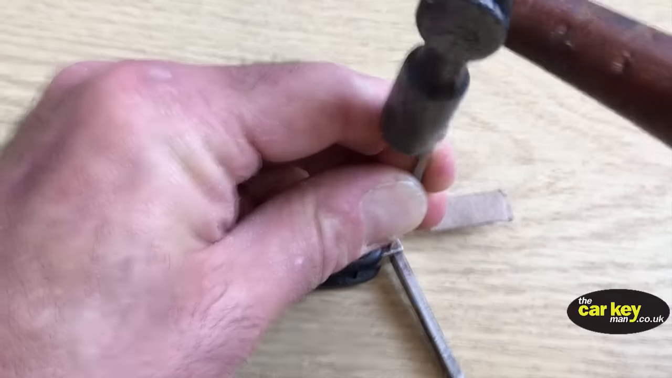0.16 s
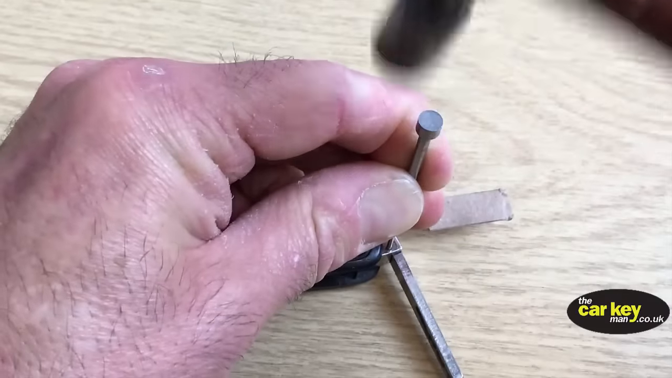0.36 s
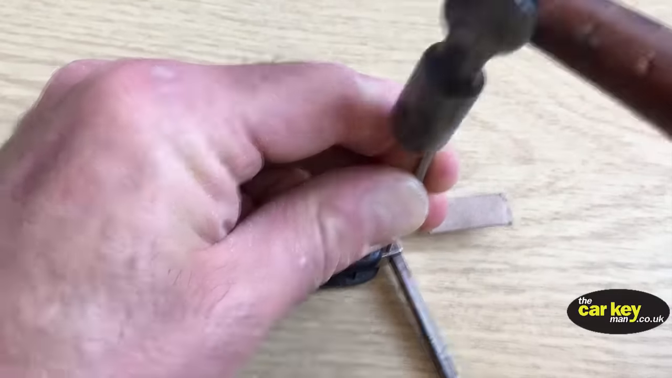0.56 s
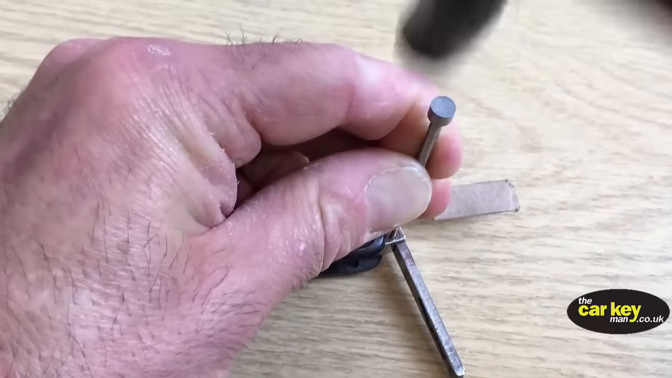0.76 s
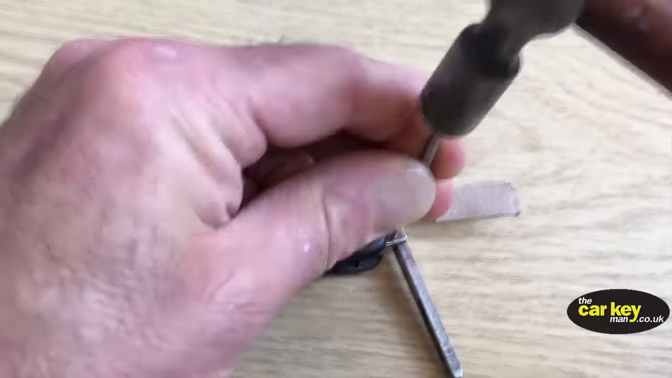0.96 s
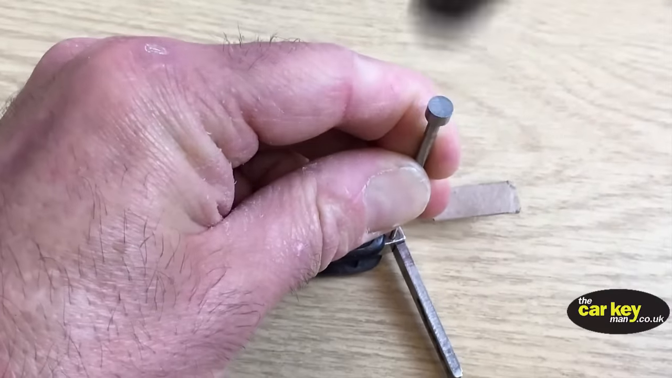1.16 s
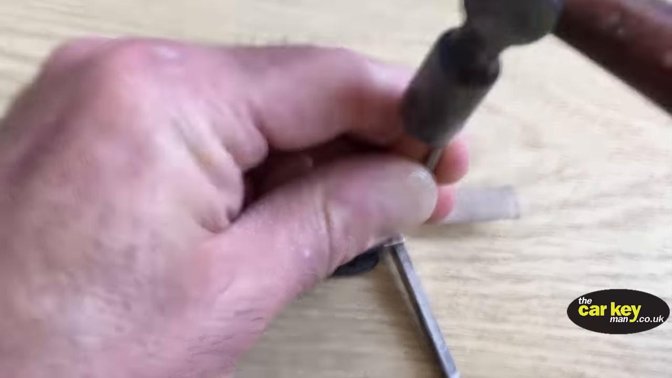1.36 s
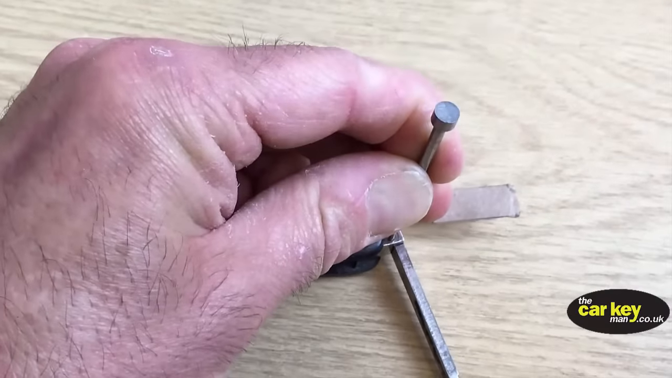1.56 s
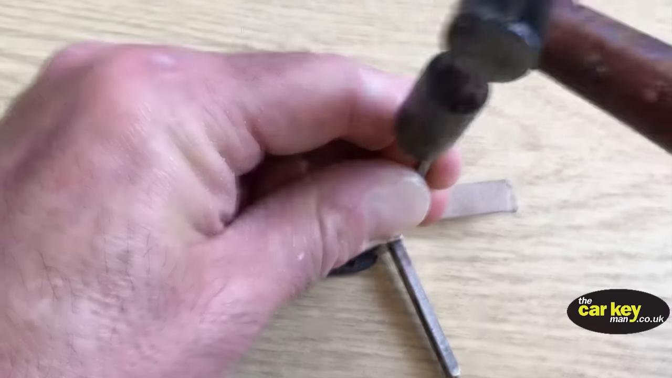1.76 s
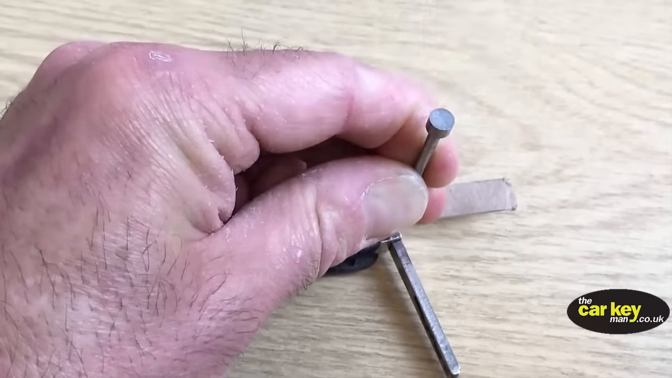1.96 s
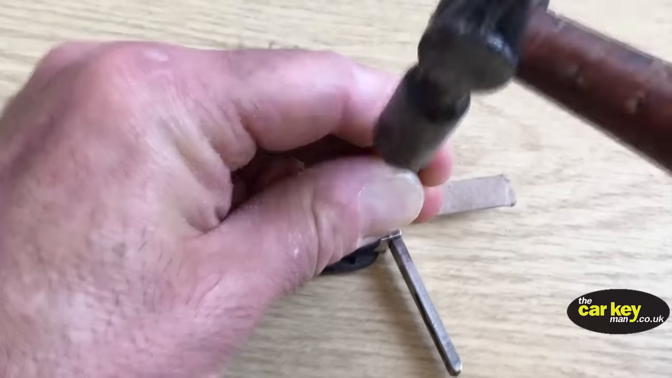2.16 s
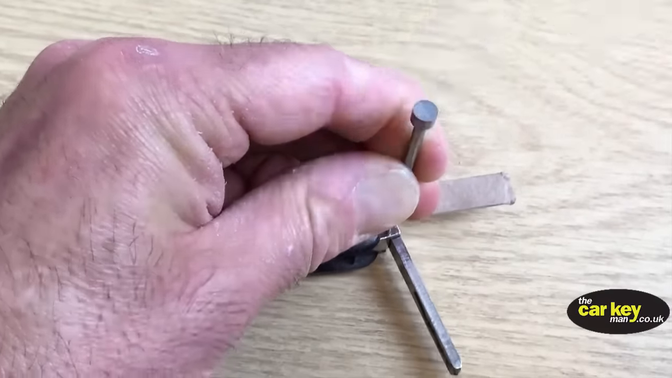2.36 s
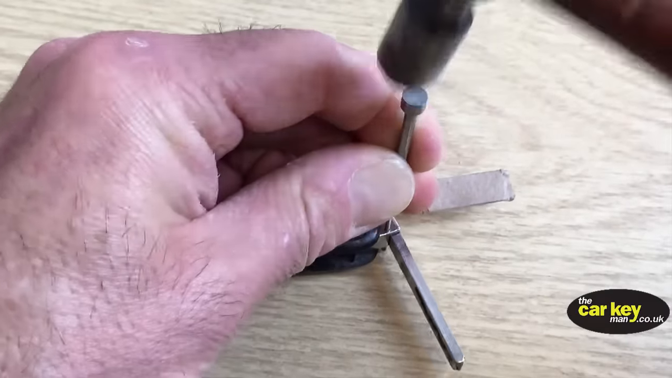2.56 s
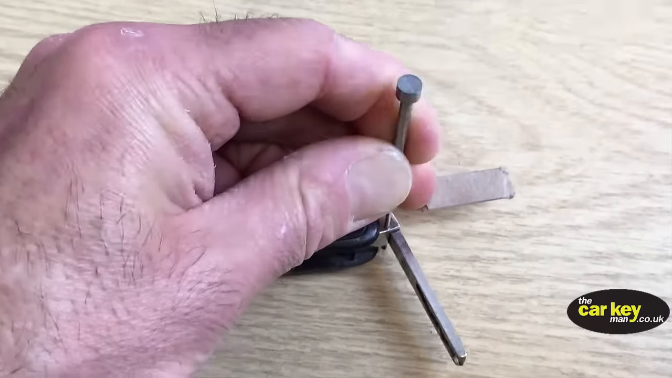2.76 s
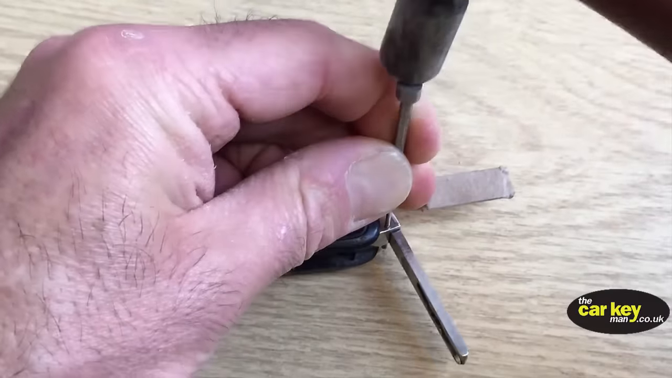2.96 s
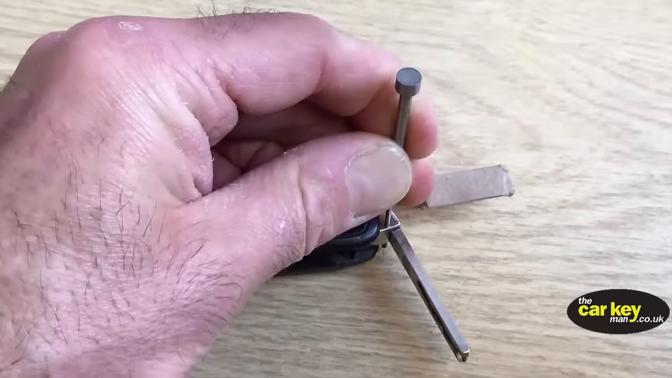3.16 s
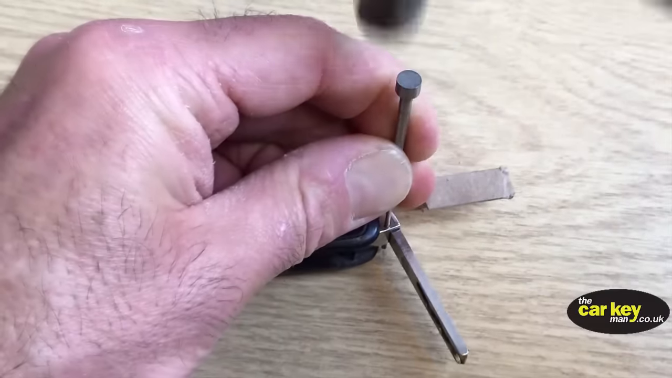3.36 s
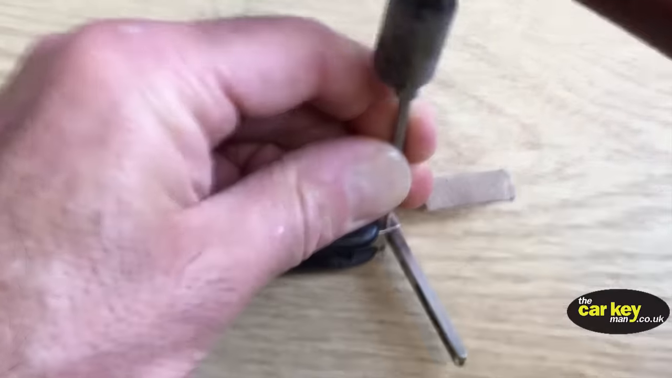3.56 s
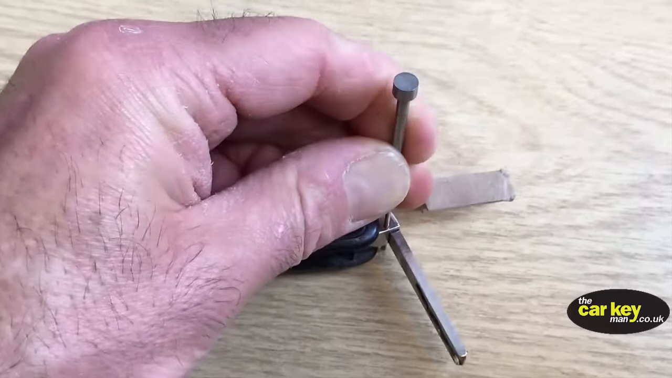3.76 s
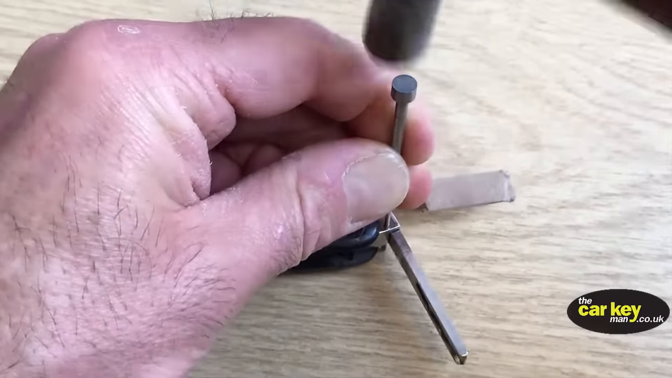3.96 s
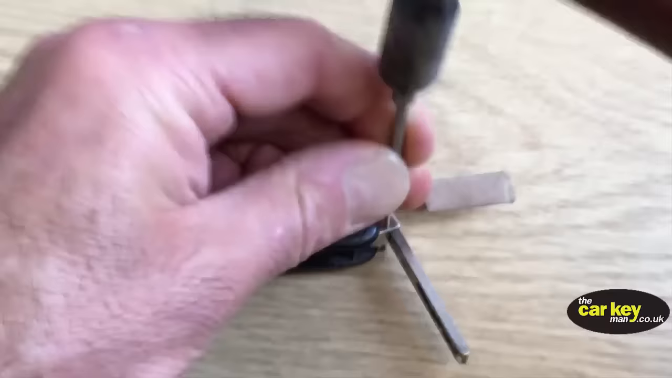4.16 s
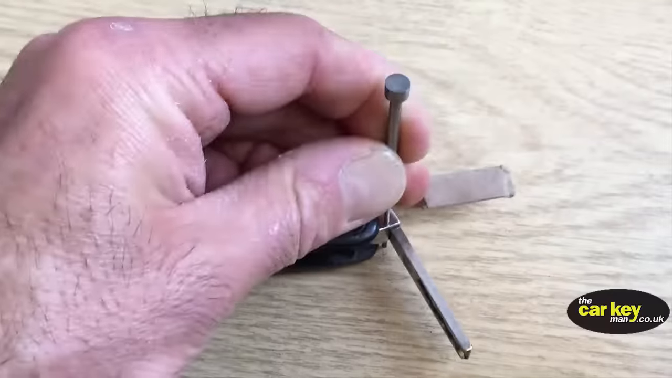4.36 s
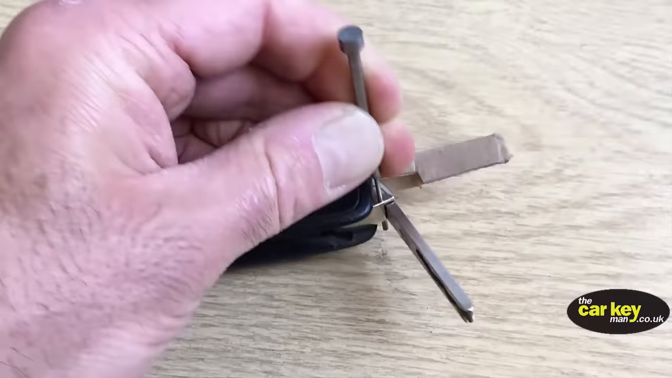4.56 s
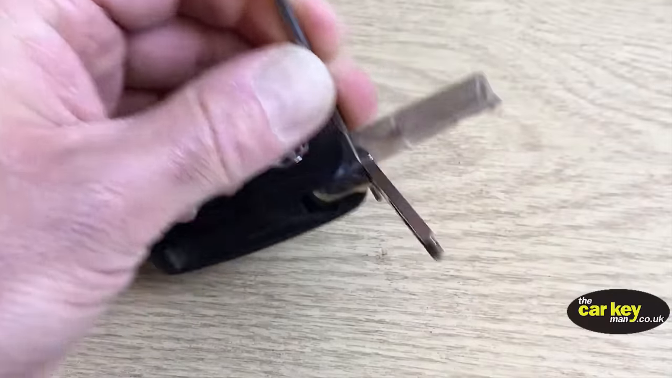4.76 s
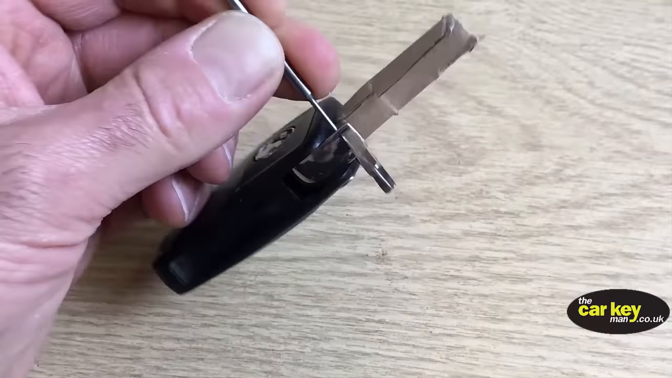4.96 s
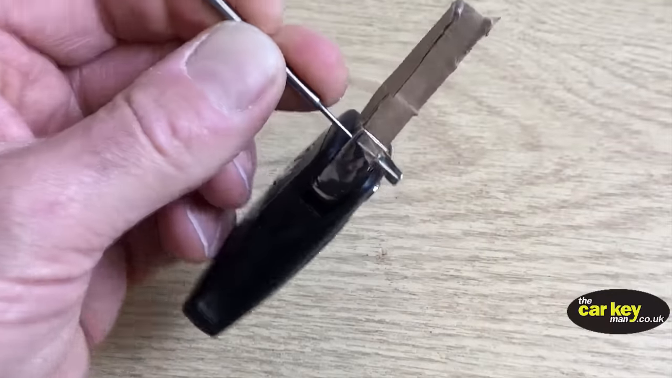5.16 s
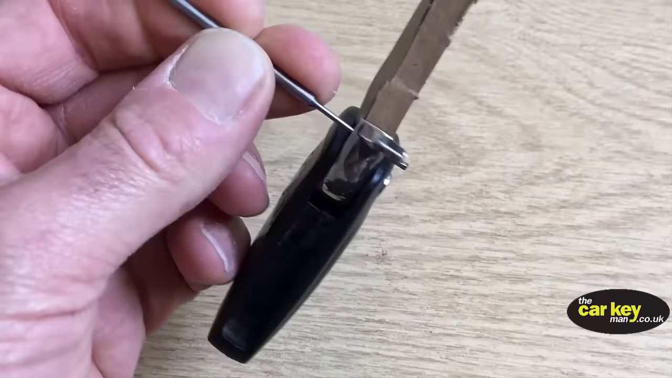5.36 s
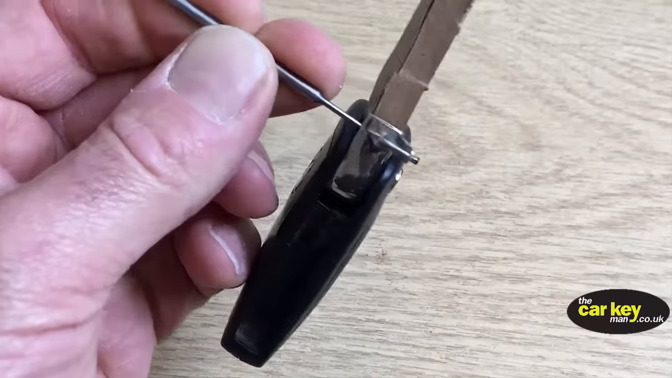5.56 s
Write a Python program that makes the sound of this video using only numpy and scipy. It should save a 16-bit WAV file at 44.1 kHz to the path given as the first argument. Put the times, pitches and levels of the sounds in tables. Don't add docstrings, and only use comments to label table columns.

```python
import sys
import numpy as np
from scipy import signal
from scipy.io import wavfile
from scipy.ndimage import uniform_filter1d

SR = 44100
rng = np.random.default_rng(int(sys.argv[2]) if len(sys.argv) > 2 else 0)


def field_ratio(decibels):
    return 10 ** (np.asarray(decibels, dtype=float) / 20)


def store_pcm(level_fs):
    pcm = np.round(np.clip(level_fs, -1, 1) * 32767).astype(np.int16)
    wavfile.write(sys.argv[1], SR, np.atleast_2d(pcm).T)


N = 247354
TIME = np.arange(N) / SR
AGE = np.arange(int(0.7 * SR)) / SR
LAG_S = 0.0006


def fade(t60_s):
    return np.exp(-np.log(1000) * AGE / t60_s)


def band(x, hz, octaves, order=2):
    edges_hz = np.clip(hz * 2.0 ** (np.array([-0.5, 0.5]) * octaves), 5, 0.45 * SR)
    y = signal.sosfilt(signal.butter(order, edges_hz, "band", fs=SR, output="sos"), x)
    return y / np.sqrt(np.mean(y ** 2, axis=-1, keepdims=True))


def burst(hz, octaves, order=2, n=len(AGE)):
    return band(rng.standard_normal(n), hz, octaves, order)


def across(hz, hzs, values):
    return np.interp(np.log(hz), np.log(hzs), values)


def add(out, sound, start_s):
    i = int(start_s * SR)
    sound = sound[max(-i, 0):N - i]
    out[max(i, 0):max(i, 0) + len(sound)] += sound


def walk(rate_hz):
    k = int(SR / rate_hz)
    steps = np.repeat(rng.standard_normal(N // k + 1), k)
    return 0.43 * uniform_filter1d(uniform_filter1d(steps, k), k)[:N]


def ping(hz, t60_s, lag_s=0.0, contact_s=0.0003):
    pull = 1 - np.exp(-(AGE / contact_s) ** 2)
    return np.roll(-np.sin(2 * np.pi * hz * AGE) * fade(t60_s) * pull, int(lag_s * SR))


def room():
    # start_s, tremor_db
    lean = [
        (0, -55),
        (.75, -52),
        (2.1, -52),
        (2.8, -59.5),
        (3.3, -52.5),
        (3.72, -41),
        (4.0, -51.5),
        (4.6, -56.5),
        (5.6, -53.5),
    ]
    # hz, density_db (dB per Hz)
    air_hz, colour_db = np.transpose([(71, -31), (120, 4), (574, -9), (722, -15.5), (1060, -18.5),
                                      (1460, -19.5), (2020, -21), (2800, -25), (9150, -35), (11500, -56.5),
                                      (15000, -82.5), (22000, -120)])
    tremor_db = np.interp(TIME, *np.transpose(lean))
    rumble = sum(field_ratio(db + 1.2 * walk(1.4)) * burst(hz, 0.9, n=N)
                 for hz, db in [(22, 5.5), (40, -8.5), (78, -9)])
    sway = burst(11, 0.85, n=N)
    air = 0
    for hz in 130 * 2 ** np.arange(0, 6.6, 0.5):
        level_db = across(hz, air_hz, colour_db) + 1.4 * walk(6.1)
        air = air + field_ratio(level_db) * np.sqrt(hz) * burst(hz, 0.87, n=N)
    air = air / np.sqrt(np.mean(air ** 2))
    air_db = -66.5 + 0.3 * (tremor_db + 55)
    return rumble * field_ratio(tremor_db - 3.5) + sway * field_ratio(tremor_db + 1) + air * field_ratio(air_db)


def jolt():
    heave = 1.7 * ping(23, 0.071, 0.0043, contact_s=0.003)
    return -(heave + 0.7 * ping(69, 0.23, 0.0025) + 0.15 * ping(73, 0.28, 0.002))


def knocks(rows, slap, drive_db, modes_db, crack_db, early_db, edge_db, thump_db, top_db, lead_db, mix,
           middle_db, scatter_db=5.5, fresh=0.7):
    # hz, level_db, t60_s
    table = [(132.5, -7, 0.38), (222.1, 0, 0.17), (383, -6, 0.084), (599, -14, 0.56), (663, -7.5, 0.084),
             (779, -6, 0.21), (864, -20, 0.51), (850, -22, 0.18), (1078, -22.5, 0.21), (1130, -13.5, 0.18),
             (1210, -25, 0.3), (1186, -7.5, 0.16), (1534, -19, 0.63), (1789, -3, 0.032), (2250, -20, 0.05),
             (1900, -38.5, 0.071), (2290, -28.5, 0.25), (2970, -30, 0.36),
             (175, -8.5, 0.12), (235, -9, 0.19), (437, -1.5, 0.062), (493, -11, 0.17)]
    # hz, level_db, t60_s
    steel = [(3568, -21, 0.13), (3730, -20, 0.33), (4440, -27.5, .12), (6170, -21, 0.32),
             (6360, -19.5, .12), (6700, -21.5, .12), (8800, -23, .14)]
    # hz, level_db, t60_s
    slow_ring = [(131.44, -25, 0.39), (224, -28.5, 0.37), (352, -23.5, 0.49), (618, -40.5, .9),
                 (828, -26, 0.31), (1445, -35.5, 0.38)]
    # hz, level_db, t60_s
    wash_hz, wash_db, wash_t60_s = np.transpose([(25, -21.5, 0.19), (69.5, -14, .4), (161, -5, 0.2),
                                                 (303, 2, 0.27), (635, 2, 0.26), (1020, -4, 0.27),
                                                 (2300, -5, 0.22), (3240, -1.5, 0.2), (5000, -7, 0.19),
                                                 (7800, -13, .19), (11000, -22.5, 0.27)])
    share_hz = [60, 200, 550, 1200, 2150, 2900, 11000]
    lead_s = 0.0035
    swing_s = 0.001
    out = np.zeros(N)

    hz, db, t60_s = np.transpose(table + steel + slow_ring)
    t60_s[:-len(slow_ring)] = np.minimum(t60_s[:-len(slow_ring)], 0.27)
    cycles = np.outer(hz, AGE)
    sign = (-1.0) ** np.arange(len(hz))[:, None]
    rings = sign * np.sin(2 * np.pi * cycles) * fade(t60_s[:, None]) * (1 - np.exp(-0.9 * cycles))
    spread = np.clip((hz - 200) / 500, 0, 1)
    db = db + 7.5 * (hz < 260) - 3 * (abs(hz - 720) < 90)

    centres_hz = 25 * 2 ** np.arange(0, 8.9, 1 / 3)
    build_up = 1 - np.exp(-(0.0001 + AGE) * (120 + 3 * centres_hz[:, None]))
    shape = fade(across(centres_hz, wash_hz, wash_t60_s)[:, None]) * build_up
    bank = [np.array([burst(f, 1 / 3, order=3) for f in centres_hz]) * shape for _ in range(3)]
    early = (1 + field_ratio(early_db) * fade(0.021)) * (1 - np.exp(-AGE / swing_s))

    luck = rng.standard_normal((len(rows), len(hz) + 1))
    for (start_s, peak_db, boom_db, knock_db, steel_db), chance in zip(rows, luck):
        board_db = boom_db + mix * (knock_db - boom_db) + middle_db
        share_db = [-19, boom_db, board_db, knock_db, knock_db + edge_db, steel_db, steel_db + top_db]
        free_db = (hz > 3000) * (-10.0 - 0.4 * peak_db)
        place_db = across(hz, share_hz, share_db) + scatter_db * spread * chance[1:]
        ring = field_ratio(modes_db + db + place_db + free_db) @ rings

        weights_db = across(centres_hz, wash_hz, wash_db) + across(centres_hz, share_hz, share_db) - 0.5
        turn = 3 * chance[0]
        grain = bank[0] + fresh * (np.cos(turn) * bank[1] + np.sin(turn) * bank[2])
        wash = field_ratio(weights_db) @ grain

        crack = field_ratio(crack_db + steel_db) * burst(8400, 0.64) * fade(0.0048)
        lead_n = int(lead_s * SR)
        rustle = np.linspace(0.6, 1, lead_n) * burst(1500, 1.7, n=lead_n)
        lead = field_ratio(lead_db + 1.2 * boom_db + 12.5) * rustle

        drive = field_ratio(peak_db + drive_db)
        add(out, drive * (early * (ring + wash) + crack + slap), start_s + LAG_S)
        add(out, drive * lead, start_s + LAG_S - lead_s)
        add(out, field_ratio(thump_db + 0.26 * peak_db) * jolt(), start_s + LAG_S)
    return out


def hammer_blows():
    # start_s, peak_db, then shares boom_db, knock_db, steel_db
    earlier = [
        (-.19, 2, -16, -12, -20),
    ]
    # start_s, peak_db, then shares boom_db, knock_db, steel_db
    blows = [(0.203, 0.5, -10.5, -9.5, -20.5), (0.615, -4, -4, -5.5, -15), (1.013, -1, -7, -5.5, -16.5),
             (1.395, 3, -8, -8.5, -18.5), (1.768, -4.5, -13.5, 1.5, -16.5), (2.156, -3.5, -10, -9.5, -26.5),
             (2.52, -10, -11, -6, -25), (2.959, -14.5, -12, -8.5, -22.5), (3.284, -13, -11, -6, -21.5),
             (3.601, -4, -16, -16, -26), (3.903, -3.5, -10.5, -9.5, -23.5), (4.236, -7.5, -6, -4, -18.5)]
    glide_cycles = 60 * (np.sqrt(AGE + 0.0003) - np.sqrt(0.0003)) + 60 * AGE
    slap = -field_ratio(11.0) * np.sin(2 * np.pi * glide_cycles) * fade(0.031)
    return knocks(earlier + blows, slap, drive_db=-5.5, modes_db=5.0, crack_db=20.0, early_db=11.5,
                  edge_db=-4.0, thump_db=-17.5, top_db=1.0, lead_db=-24.0, mix=0.25, middle_db=-4.5)


def key_seat():
    # start_s, peak_db, centre_hz, t60_s
    body = [
        (1.767, 0, 817, 0.2),
        (2.157, 1.5, 647, 0.11),
        (2.521, -8.5, 659, 0.1),
        (3.284, -0.5, 750, 0.099),
        (3.601, -4.5, 738, 0.23),
        (3.903, -1.5, 802, 0.2),
    ]
    # start_s, peak_db, centre_hz, t60_s
    blade = [
        (1.7677, 7, 1238, 0.11),
        (1.8024, -2, 1130, 0.24),
        (2.5209, -9, 1130, 0.11),
        (2.9588, -5.5, 1380, 0.17),
        (3.603, -10.5, 1420, 0.25),
        (4.2374, 1.5, 1195, 0.09),
    ]
    out = np.zeros(N)
    for rows, octaves, trim_db in (body, 0.22, -9), (blade, 0.3, -11):
        for start_s, peak_db, hz, t60_s in rows:
            cluster = burst(hz, octaves) * fade(t60_s)
            add(out, field_ratio(peak_db + trim_db) * (cluster + 1.5 * ping(hz, 0.059)), start_s + LAG_S)
    return out


def punch_rebounds():
    # start_s, peak_db, centre_hz
    rebounds = [
        (1.883, -31.5, 4440),
        (2.209, -29, 4230),
        (2.574, -31, 3970),
        (3.006, -34, 6700),
        (3.208, -52.5, 4100),
        (3.3107, -21.5, 6800),
        (3.5268, -57, 4020),
        (3.6258, -16, 4000),
    ]
    out = np.zeros(N)
    for start_s, peak_db, hz in rebounds:
        add(out, field_ratio(peak_db - 5.5) * burst(hz, 2.0) * (fade(0.0085) + 0.07 * fade(0.1)), start_s)
    return out


def key_clicks():
    # start_s, peak_db, centre_hz, t60_s
    clicks = [(4.529, -66, 510, 0.036), (4.628, -52, 501, 0.03), (4.678, -43.5, 773, 0.062),
              (4.779, -49.5, 777, 0.095), (4.798, -48, 730, 0.17), (4.981, -44, 790, 0.03),
              (5.015, -37, 1027, 0.013), (5.058, -44, 1340, 0.026), (5.319, -36, 707, 0.052),
              (5.373, -40, 1040, 0.041), (5.383, -47, 1790, 0.063), (5.439, -56, 615, 0.021),
              (5.505, -47, 770, 0.028), (5.54, -46, 498, 0.022)]
    out = np.zeros(N)
    for start_s, peak_db, hz, t60_s in clicks:
        noise = burst(1500 + 0.27 * hz, 2.3) * (fade(0.0095) + 0.18 * fade(0.5))
        tone = 0.59 * burst(hz, 0.5) * fade(1.2 * t60_s) + 0.7 * ping(hz, t60_s)
        tone = tone * (1 - np.exp(-AGE / (0.027 * t60_s)))
        add(out, field_ratio(peak_db - 5.5) * (tone + 0.41 * (hz / 1000) ** 0.5 * noise), start_s)
    return out


def finger_rubs():
    # start_s, length_s, level_db
    rubs = [
        (4.62, 0.19, -70),
        (4.9, 0.085, -86),
        (5.007, 0.3, -63.5),
        (5.304, 0.096, -65.5),
    ]
    attack_s, t60_s = 0.0073, 0.38
    grains = rng.standard_normal(N) * field_ratio(8.6 * walk(150))
    strokes = 0
    for start_s, length_s, level_db in rubs:
        fall_db = 60 * np.maximum(TIME - start_s - length_s, 0) / t60_s
        strokes = strokes + field_ratio(level_db - fall_db) * np.clip((TIME - start_s) / attack_s, 0, 1)
    return band(grains, 1180, 1.0) * strokes


def hammer_laid():
    # start_s, peak_db, then shares boom_db, knock_db, steel_db
    laid = [
        (5.13, -13, -5.5, -2.5, -31.5),
        (5.144, -8.5, -19.5, -8, -29),
        (5.174, -16.5, -12, -9, -45),
        (5.187, -37, -20, -17, -29),
    ]
    pat = field_ratio(21.5) * ping(960, 0.0024, contact_s=0.00026)
    pat = pat + field_ratio(14.5) * ping(840, 0.013, 0.00306, contact_s=0.00045)
    return knocks(laid, pat, drive_db=-7.5, modes_db=-6.5, crack_db=-8.0, early_db=-18.0, edge_db=-19.5,
                  thump_db=-63.0, top_db=-5.5, lead_db=-32.0, mix=0.87, middle_db=-5.5, fresh=0.31)


def scene():
    blows = hammer_blows() + key_seat() + punch_rebounds()
    handling = key_clicks() + finger_rubs() + hammer_laid()
    return (room() + blows + handling)[None]


def low_pass(x):
    return signal.sosfilt(signal.butter(12, 12040, fs=SR, output="sos"), x)


def record(dry):
    ceiling, knee, top_hz = 0.7, 8.0, 10800
    flat = dry / (1 + np.abs(dry / ceiling) ** knee) ** (1 / knee)
    mix = signal.sosfilt(signal.ellip(10, 0.2, 80, top_hz, fs=SR, output="sos"), flat)
    return low_pass(mix)


dry = scene()
out = record(dry)
store_pcm(out)
```